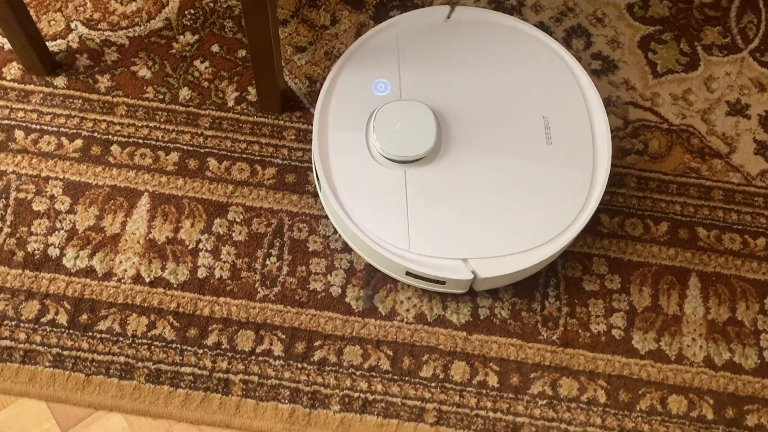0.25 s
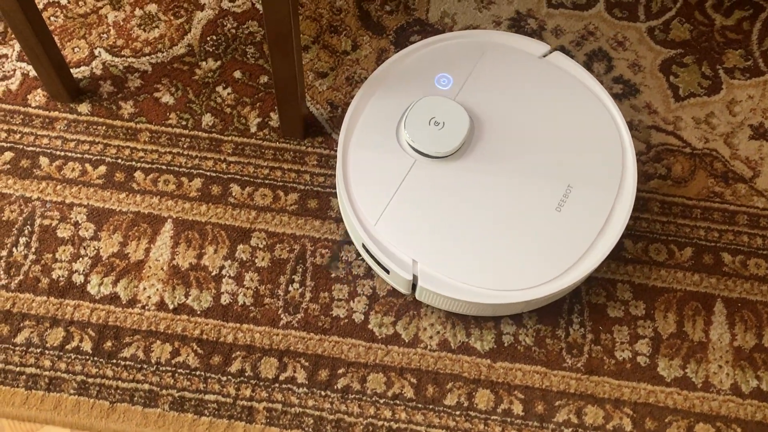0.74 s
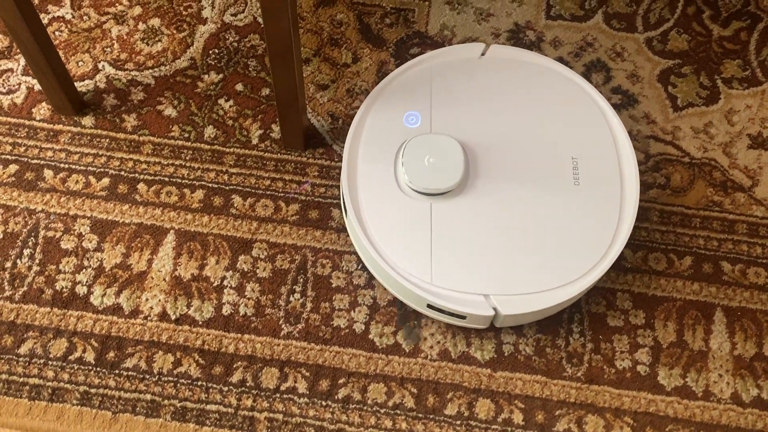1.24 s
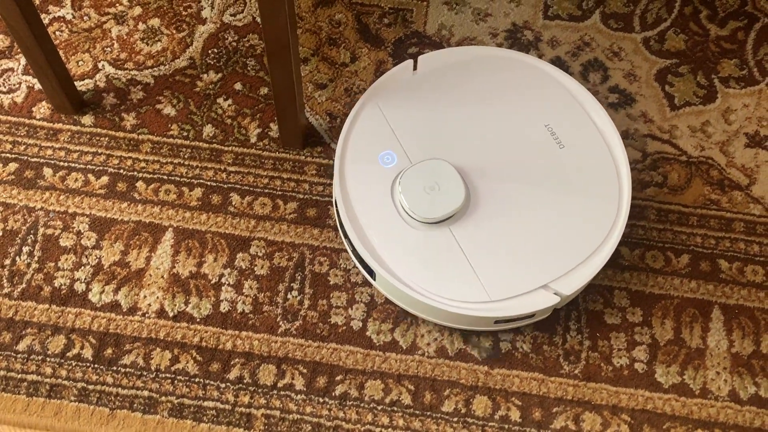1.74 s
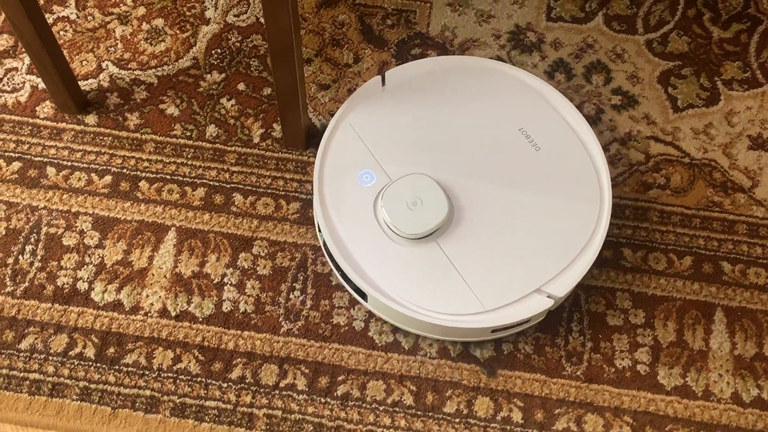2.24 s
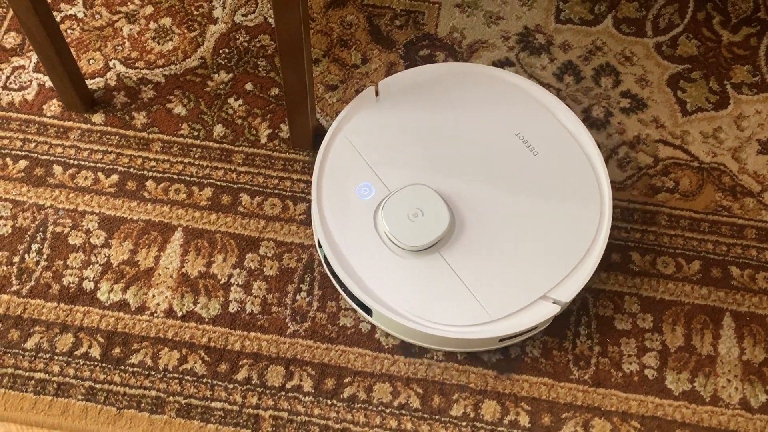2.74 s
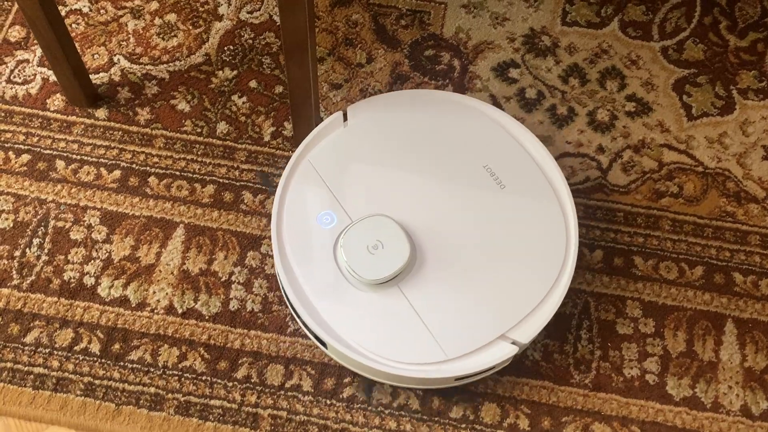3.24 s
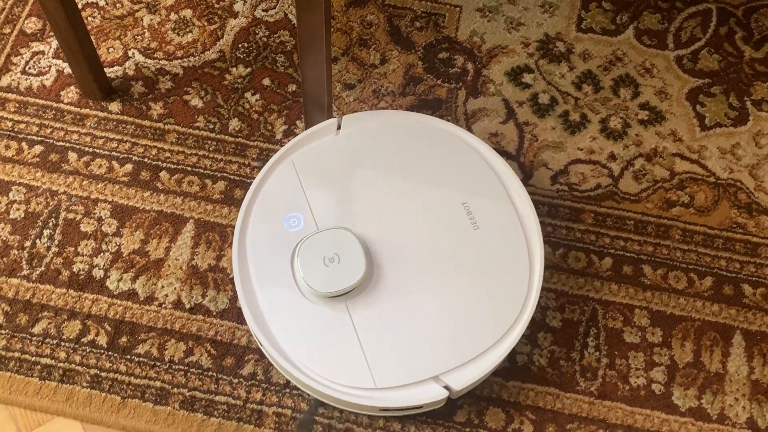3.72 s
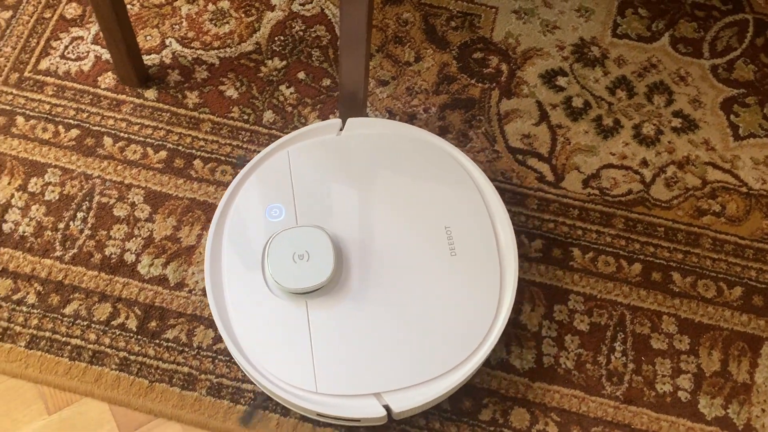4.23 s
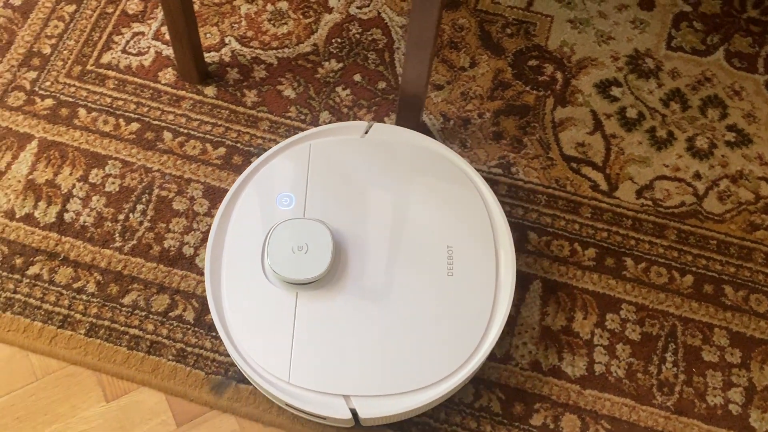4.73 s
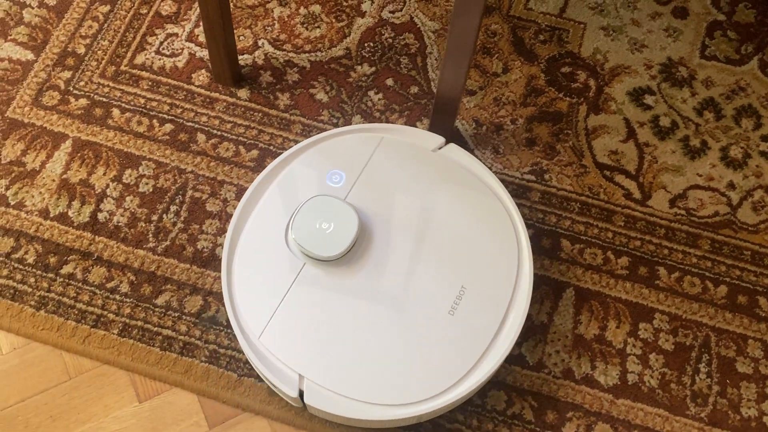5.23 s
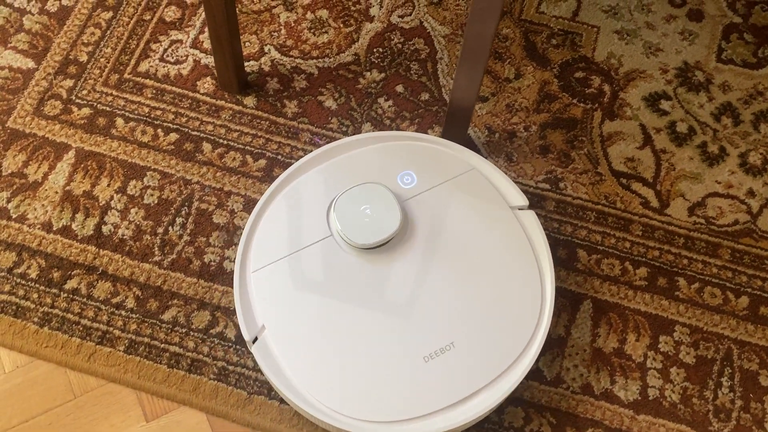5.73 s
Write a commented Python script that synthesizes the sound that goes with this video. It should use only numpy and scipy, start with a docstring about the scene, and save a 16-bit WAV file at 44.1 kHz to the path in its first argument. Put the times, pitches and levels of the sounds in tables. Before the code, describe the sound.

A robot vacuum works on a rug indoors, heard from about a metre above on a hand-held stereo microphone. A steady fan hum, high whine and rush of air run throughout. The brush growls early, briefly again past two seconds, and strains near the end. From about 2.7 to 5 seconds the body rocks in quick soft bass throbs, with faint squeaks and cushioned shell hums.

```python
"""On a rug, a robot vacuum creeps and turns about a metre below a hand-held microphone.
Its suction fan hums at shaft speed, whines as its blades pass the outlet and blows a rush of air.
The geared brush roller starts lightly loaded, then three times digs in, slows down and growls.
The body rocks with soft bass throbs, the shell hums when bumped and a wheel gives short squeaks.
Steady tones are shaken sine waves; rumble and air are shaped noise."""
import sys
import numpy as np
from scipy import signal
from scipy.fft import rfft, irfft, next_fast_len
from scipy.io import wavfile
from scipy.ndimage import uniform_filter1d

SR = 44100
rng = np.random.default_rng(int(sys.argv[2]) if len(sys.argv) > 2 else 0)


def unload_audio(sound):
    """Save the sound as a 16-bit wav file, at the path given as the first command line argument."""
    columns = np.transpose(np.atleast_2d(sound))
    # keep every value between -1 and 1, then stretch to whole-number steps
    steps = np.round(np.clip(columns, -1, 1) * 32767)
    wavfile.write(sys.argv[1], SR, steps.astype(np.int16))


N = 263277
TIME = np.arange(N) / SR  # seconds

# speed of the fan shaft, almost steady: (t/s, speed/turns per s)
FAN_SPEED = [(.35, 271.8), (1.0, 270.5), (1.7, 270.3), (2.3, 269.8), (2.95, 270.1), (3.8, 271.6),
             (4.35, 271.5), (4.57, 270.8), (4.8, 269.0), (5.05, 269.5), (5.45, 270.5), (5.97, 271.1)]
# hum at the shaft speed, swelling as the robot turns: (t/s, level/dB)
HUM_LEVEL = [(0, -50.5), (.8, -48.5), (.98, -42), (2.31, -42), (2.37, -51), (2.6, -43.5), (2.67, -41.5),
             (4.56, -40.5), (4.65, -33.5), (4.95, -35.5), (5.15, -38), (5.6, -42.5), (5.78, -36.5)]
# hum one octave above the shaft: (t/s, level/dB)
OCTAVE_LEVEL = [(0, -44.5), (1.5, -44.5), (2.45, -59.5), (3.3, -41.5), (4.7, -49), (5.97, -47)]
# blade whine, swelling and fading through standing waves in the room, before trim and contrast: (t/s, level/dB)
WHINE_CURVE = [(0.0, -57.5), (.33, -54.5), (.6, -58.5), (1.1, -55.5), (1.38, -54), (1.61, -49.5),
               (2.95, -47), (3.2, -51.5), (3.76, -57), (3.99, -47.5), (4.14, -49), (4.32, -59.5),
               (4.57, -44), (4.65, -54), (4.79, -64), (4.92, -57), (4.99, -48.5), (5.1, -50.5),
               (5.19, -56.5), (5.48, -65.5), (5.7, -58.5), (5.78, -60.5), (5.97, -54)]
# weaker fan tones: (multiple of the shaft speed, level/dB, roughness/0-1, lead of left/rad)
FAN_OVERTONES = [(3, -57, .7, 3.6), (8, -63, .8, 1.5), (10, -63, .8, 1.8), (11, -61, .7, 2.2),
                 (15, -65, .6, 3), (24, -67, .6, 3.1)]

# air stream before the offsets in AIR_FACING: (f/Hz, density/dB per Hz)
AIR_SPECTRUM = [(350, -100), (500, -70), (600, -74.5), (950, -68.5), (1250, -73), (1500, -78.5),
                (1950, -79.5), (2900, -75.5), (3800, -83), (4300, -84), (6300, -78)]
# thin top of the air stream, with the same offsets to come: (f/Hz, density/dB per Hz)
HISS_SPECTRUM = [(7900, -93.5), (10000, -96.5), (12500, -98), (14500, -103), (15700, -110)]
# resonances and dips of the air duct and shell: (f/Hz, width/Hz, lift/dB)
DUCT_RESONANCES = [(648, 30, 6.5), (710, 130, 1.5), (841, 130, 3), (1240, 190, 1.5), (2396, 230, 4),
                   (2330, 63, -6), (3174, 200, 4), (4240, 540, 4), (6180, 280, -4.5)]
# the air rises and falls as the vents turn; only changes about the mean count: (t/s, level/dB)
AIR_SWELL = [(0.0, -55.5), (0.01, -52), (0.65, -49.5), (2.24, -54), (2.31, -57.5), (4.06, -48),
             (5.45, -48.5), (5.94, -50), (5.97, -56)]
# how each part of the air stream follows that swell: (f/Hz, share, offset/dB)
AIR_FACING = [(1170, 0.18, -0.95), (2940, 0.092, 0), (5860, 0.76, -7), (11600, 0.28, -11.5)]
# vent resonances that sweep past as the robot turns: (middle t/s, length/s, f/Hz, width/Hz, lift/dB)
VENT_BEAMS = [(0.495, 0.41, 1220, 302, 3.5), (2.2, 2.2, 6130, 400, 9.5), (2.59, 1.9, 3200, 216, 1.5),
              (2.993, 0.62, 2330, 124, 2.5), (4.095, 0.43, 2830, 198, 4.5), (4.398, 1.5, 4270, 392, 3.5),
              (4.848, .5, 605, 148.4, -9.5), (4.9, 0.65, 2440, 348, -1), (5.703, 1.6, 3260, 600, -4)]

# roller tones before trims, rocking and growl:
# (multiple of roller speed, free level/dB, loaded level/dB, load/0-1 at which it is fully out)
ROLLER_OVERTONES = [(2, -67, -51, .9), (3, -55, -46.5, .4), (4, -49, -48.5, .7), (5, -54, -42.5, .85),
                    (6, -62, -48, .9), (7, -62, -47.5, 1), (8, -54, -41, .7), (9, -53, -47.5, .6),
                    (10, -55, -54, .8), (11, -61, -53, .7), (12, -62, -54, .9), (13, -63, -55, .9),
                    (14, -60, -53, .9), (19, -64, -53, .9)]
# overtones of the brush motor: (multiple of motor speed, free level/dB, loaded level/dB)
MOTOR_OVERTONES = [(2, -56.5, -55.5), (6, -68.5, -57)]
# gears meshing, a whine at three times the motor speed: (t/s, level/dB)
GEAR_MESH_LEVEL = [(0, -49.5), (.4, -46.5), (.8, -53), (1.45, -47), (1.9, -64.5), (2.25, -51), (2.8, -64),
                   (3.9, -50.5), (4.5, -53), (4.8, -47.5), (5.25, -50), (5.5, -57)]
# whine of the roller's gear teeth, clearest while creeping straight on: (t/s, level/dB)
TEETH_LEVEL = [(.2, -56), (.6, -60), (1.7, -58), (2.05, -52), (2.25, -50), (2.5, -51), (2.7, -51),
               (3.1, -49.5), (3.45, -53), (3.9, -63), (5.2, -64), (5.9, -56)]
# the roller drags and digs into the pile; motor level is before the shell colours it:
# (start t/s, time to bite/s, let-go t/s, release/s, load/0-1, motor level/dB, extra growl/dB, growl f/Hz)
ROLLER_DIGS = [(-.4, .8, .5, .1, .38, -57, 1, 225), (.32, .56, 1.07, .13, .93, -41.5, -.5, 225),
               (2.29, .09, 2.53, .13, 1.0, -50, 1, 312), (5.15, .8, 6.2, .1, .86, -37, -.3, 360)]

# bristles scrubbing the rug, before trim, load and shell: (f/Hz, density/dB per Hz)
SCRUB_SPECTRUM = [(20, -107), (35, -99), (60, -83.5), (115, -77.5), (165, -77), (198, -63.5), (222, -70.5),
                  (255, -65.5), (305, -72), (360, -65), (430, -65.5), (500, -65), (580, -66), (750, -100)]
# how much the shell's ring lifts the rumble, most as the robot pivots: (t/s, lift/dB)
SHELL_LIFT = [(0, 0.5), (1.4, -1.5), (3.6, -4), (4.6, 2.5), (4.9, -8), (5.3, 5)]

# rocks of the body on the pile, about ten a second in busy stretches: (middle t/s, strength/dB)
BODY_ROCKS = [(1.68, -10), (1.8, -13), (1.92, -11), (2.02, -10), (2.12, -11.5), (2.23, -11.5),
              (2.752, -1.5), (2.85, -8), (2.937, -3.5), (3.005, 2), (3.106, -3), (3.229, -0.5),
              (3.321, -2.5), (3.442, -7), (3.544, 3), (3.641, -2), (3.747, -5), (3.832, -1.5), (3.916, 1.5),
              (4.0, -2), (4.082, 0), (4.189, -1.5), (4.291, -0.5), (4.366, -4), (4.473, 0.5), (4.558, -2.5),
              (4.666, -4), (4.745, -6), (4.853, -3.5), (4.932, -7), (5.066, -8.5), (5.249, -1)]
# a wheel squeaks on the pile in short slips:
# (start t/s, length/s, first f/Hz, last f/Hz, level at its middle/dB, lead of left/rad)
WHEEL_SLIPS = [(2.8, .05, 820, 850, -42, 2.9), (3.638, .06, 2920, 2880, -49.5, .5),
               (3.662, .048, 2830, 2670, -51.5, .5), (3.718, .038, 2910, 3040, -51, .5),
               (3.755, .058, 2910, 2610, -48.5, .5), (4.055, .045, 950, 1010, -47, 1.5),
               (4.73, .06, 840, 910, -45, 1.5), (4.855, .06, 860, 1010, -41, 2.4),
               (4.93, .045, 830, 860, -44, 2.4)]
# the shell is bumped now and then during the rocking: (middle t/s, f/Hz, level at its middle/dB)
SHELL_BUMPS = [(2.997, 358, -42), (3.747, 380, -50), (3.855, 358, -42), (4.004, 377, -41.5),
               (4.186, 382, -41.5), (4.373, 366, -42), (4.487, 385, -42), (4.555, 389, -43),
               (4.664, 380, -36), (5.093, 383, -46)]

# the two microphone ports: (f/Hz, left over right/dB, coherence/0-1, lead of left/rad)
PORT_TABLE = [(58, -1.5, 0.57, 1.8), (131, 2.5, 0.51, 0.17), (234, 10.5, 1, 1.54), (361, 9, 0.77, 0.76),
              (412, 9.5, 0.31, 2.4), (554, 2.5, 1, 3.39), (888, 1, 0.77, 3.23), (1222, 0.6, 0.69, 4.25),
              (2140, 2.5, 0.063, 3.62), (2290, 1, 0.48, 4.02), (3000, 0.5, 0.85, 3.97),
              (3620, -5, 0.083, 3.24), (5650, 0, 0.26, 3.16), (7350, 0, 1, 1.54)]
# the same table for the treble, where left and right are nearly opposite from 8 to 12 kHz:
# (f/Hz, left over right/dB, coherence/0-1, lead of left/rad)
PORT_TABLE_TOP = [(8300, 0, .997, 3.14), (11500, 0, .997, 3.14), (12500, 0, .8, 3.5), (14500, 0, .47, 4.8)]
# relative depth of the random fine ripple in the air and rumble: (f/Hz, relative depth)
RIPPLE_DEPTH = [(3000, 1), (4500, 1.3), (7000, 1.3), (9000, 1)]

BLADES = 12
WHINE_TRIM_DB, WHINE_CONTRAST = 1.5, 1.13  # overall level, and how strongly the whine follows its curve
# how much turbulence shakes each kind of tone (0-1)
HUM_ROUGH, WHINE_ROUGH, ROLLER_ROUGH, STRAIN_ROUGH = .16, .15, .2, .33

FLUTTER_DB, FLUTTER_HZ = .45, 40  # the whirling bristles chop the air stream: depth and rate

# roller speed running free and its loss under full load (turns a second), and its lag (s)
FREE_SPEED, SAG_SPEED, INERTIA_S = 47.9, 3.5, .04
GEAR_RATIO = 8.68  # motor turns per roller turn
BITE_CURVE = .7  # under 1: the pile takes hold quickly, then tightens slowly
FREE_TRIM_DB, LOADED_TRIM_DB = -1.5, -2.7  # roller tones running free and under load
GROWL_LIFT_DB, GROWL_WIDTH_HZ = 2.5, 40  # each dig rings the shell at its own growl pitch
MOTOR_ONSET, MOTOR_FULL = .28, .44  # loads (0-1) between which the motor starts to sing
MOTOR_BAND_HZ = 70  # the motor sings best while its speed lies in a band this wide
STRAIN_OVERTONE_DB = -10  # octave of the straining motor, relative to its main tone
TEETH_PER_TURN, TEETH_WAVER, TEETH_ROUGH = 51, .004, .8

SHELL_HZ, SHELL_WIDTH_HZ = 395, 50  # the underside of the shell rings here
SCRUB_DB, SCRUB_LOAD_DB = -.8, .7  # rumble trim, and lift at full load

THROB_HZ, THROB_S, THROB_TRIM_DB = 133.5, .064, -47  # pitch, length, and level added to each rock
THROB_EVERY_S = .0965  # span over which the rocking is averaged
ROCK_DB, ROCK_SCRUB_DB = 6, 3.5  # how much rocking swells the roller tones and the rumble
BUMP_S = .051
EDGE_HZ = 15750  # upper limit of the sound


def amp(db):
    """Turns decibels into gain."""
    return 10 ** (np.asarray(db) / 20)


def evened(x):
    """Scales a signal to rms 1."""
    return x / np.sqrt(np.mean(x ** 2) + 1e-20)


def follow(rows, t=TIME, axis=1):
    """Reads one column of a time table, joined by straight lines."""
    table = np.transpose(rows)
    return np.interp(t, table[0], table[axis])


def read(rows, hz, axis=1):
    """Reads one column of a frequency table, joined on a log axis."""
    table = np.transpose(rows)
    return np.interp(np.log(hz + 1), np.log(table[0] + 1), table[axis])


def bell(x, centre, width):
    """Power curve of a resonance: 1 at its centre, half at the edges of its width."""
    return 1 / (1 + (2 * (x - centre) / width) ** 2)


def wander(rate_hz):
    """Slow random drift of rms 1, with little faster than the rate."""
    step = 64  # samples between drawn points
    count = next_fast_len(N // step + 2)
    hz = np.fft.rfftfreq(count, step / SR)
    spectrum = rfft(rng.standard_normal(count)) / (1 + (hz / rate_hz) ** 4)
    slow = evened(irfft(spectrum, count))
    return np.interp(TIME, np.arange(count) * step / SR, slow)


def balance(side_db):
    """Left and right gains whose mean power is 1."""
    pair = np.array([amp(side_db), np.ones_like(side_db)])
    return pair / np.sqrt((pair ** 2).mean(0))


def ports(hz):
    """Balance, coherence and phase between the microphone ports at a frequency."""
    return [read(PORT_TABLE + PORT_TABLE_TOP, hz, axis=k) for k in (1, 2, 3)]


def tone(turns, db, side_db, lead, rough, flutter_hz):
    """A spinning part's tone at both ports; turbulence shakes its height and phase."""
    shake = np.array([wander(flutter_hz) + 1j * wander(flutter_hz) for _ in range(3)]) / np.sqrt(2)
    # one shake is shared, the other two belong to one port each
    carrier = (1 + rough * (shake[0] + .5 * shake[1:])) / np.sqrt(1 + rough ** 2)
    port_phase = np.exp(1j * np.array([[lead], [0]]))
    wave = carrier * np.exp(2j * np.pi * turns) * port_phase
    return np.sqrt(2) * amp(db) * balance(side_db)[:, None] * wave.real


def chirp(start, length, first_hz, last_hz, level_db, side_db, lead):
    """A short tone at both ports that swells, glides a little unsteadily and fades."""
    at = np.flatnonzero((TIME >= start) & (TIME < start + length))
    part = (TIME[at] - start) / length
    glide_hz = first_hz + (last_hz - first_hz) * part
    turns = np.cumsum(glide_hz * (1 + .009 * wander(70)[at])) / SR
    wave = np.sin(np.pi * part) * np.cos(2 * np.pi * turns + np.array([[lead], [0]]))
    out = np.zeros((2, N))
    out[:, at] = np.sqrt(2) * amp(level_db) * balance(side_db)[:, None] * wave
    return out


def turbulence(level_db, ripple_db, flicker_db, size=2048):
    """Noise at both ports with the density level_db(t, hz), plus random fine ripple and flicker."""
    hop = size // 4
    t = np.arange(N // hop + 5)[:, None] * hop / SR
    hz = np.fft.rfftfreq(size, 1 / SR)
    a, b, c, d, ripple, flicker = rng.standard_normal((6, len(t), len(hz)))
    # ripple lasts long but is narrow in pitch; flicker is brief but broad
    ripple = evened(uniform_filter1d(uniform_filter1d(ripple, size=45, axis=0), size=2, axis=1))
    flicker = evened(uniform_filter1d(uniform_filter1d(flicker, size=6, axis=0), size=40, axis=1))
    side_db, same, lead = ports(hz)
    same = np.clip(same, 0, 1)
    right = a + 1j * b
    left = (same * right + np.sqrt(1 - same ** 2) * (c + 1j * d)) * np.exp(1j * lead)
    spectrum = np.array([left, right]) * balance(side_db)[:, None]
    bin_width = 1.5 * SR / size  # Hz
    shaped_db = level_db(t, hz) + ripple_db * read(RIPPLE_DEPTH, hz) * ripple + flicker_db * flicker
    spectrum *= amp(shaped_db) * np.sqrt(bin_width)
    return signal.istft(spectrum.swapaxes(1, 2), nperseg=size, noverlap=size - hop)[1][:, :N]


def grip(start, bite_s, end, release_s, load, t=TIME):
    """The load of one dig, 0-1: the pile takes hold, tightens and lets go."""
    bite = np.clip((t - start) / bite_s, 0, 1) ** BITE_CURVE
    return load * bite * np.clip(1 - (t - end) / release_s, 0, 1)


def drag(t=TIME):
    """The load on the roller, 0-1: the strongest dig at each moment."""
    return np.max([grip(*dig, t) for *dig, _, _, _ in ROLLER_DIGS], axis=0)


def rocking():
    """One soft swell of pressure each time the body rocks."""
    swell = np.zeros(N)
    for middle, level_db in BODY_ROCKS:
        part = swell[round((middle - THROB_S / 2) * SR):][:round(THROB_S * SR)]
        part += amp(level_db) * np.sin(np.linspace(0, np.pi, len(part))) ** 2
    return swell


def pressure(rock):
    """Above zero while the rocking presses the bristles in, below while it lifts them."""
    return rock - uniform_filter1d(rock, size=round(THROB_EVERY_S * SR))


def fan():
    """An uneven fan wheel hums once a turn; its blades passing the outlet whine."""
    turns = np.cumsum(follow(FAN_SPEED) * (1 + .00063 * wander(5.7))) / SR
    out = tone(turns, follow(HUM_LEVEL), side_db=17.0, lead=-1.15, rough=HUM_ROUGH, flutter_hz=14)
    out += tone(2 * turns, follow(OCTAVE_LEVEL), side_db=5.5, lead=3.37, rough=.18, flutter_hz=5.0)
    beam = follow(WHINE_CURVE)
    whine_db = beam.mean() + WHINE_TRIM_DB + WHINE_CONTRAST * (beam - beam.mean())
    out += tone(BLADES * turns, whine_db, side_db=3.5, lead=-1.35, rough=WHINE_ROUGH, flutter_hz=29.4)
    for multiple, level_db, rough, lead in FAN_OVERTONES:
        side_db = ports(round(multiple) * follow(FAN_SPEED).mean())[0]
        out += tone(round(multiple) * turns, level_db, side_db, lead, rough, flutter_hz=2.2)
    return out


def air():
    """Rushing air is noise, coloured by the duct and by the way the vents face."""
    def level_db(t, hz):
        """Density of the air stream in dB per Hz."""
        duct = sum(db * bell(hz, centre, width) for centre, width, db in DUCT_RESONANCES)
        beams = sum(db * bell(t, middle, length) * bell(hz, centre, width)
                    for middle, length, centre, width, db in VENT_BEAMS)
        swell = follow(AIR_SWELL, t) - follow(AIR_SWELL).mean()
        facing = read(AIR_FACING, hz) * swell + read(AIR_FACING, hz, axis=2)
        return read(AIR_SPECTRUM + HISS_SPECTRUM, hz) + duct + beams + facing
    return amp(FLUTTER_DB * wander(FLUTTER_HZ)) * turbulence(level_db, ripple_db=2.6, flicker_db=.7)


def roller(turns, speed, load, rock):
    """Bristle rows slap the rug on every turn, and growl as the pile loads them."""
    # turns by which rocking jostles the bristles
    sway = .012 * uniform_filter1d(rock, size=SR // 4) * wander(12) / rock.mean()
    press_db = ROCK_DB * pressure(rock)
    grips = [(grip(*dig), db, hz) for *dig, _, db, hz in ROLLER_DIGS]
    out = np.zeros((2, N))
    for multiple, free_db, loaded_db, full_load in ROLLER_OVERTONES:
        growl = np.minimum(load / full_load, 1) ** 2
        side_db, _, lead = ports(round(multiple) * speed.mean())
        line_hz = multiple * (FREE_SPEED - SAG_SPEED)
        extra_db = sum(held * (db + GROWL_LIFT_DB * bell(line_hz, hz, GROWL_WIDTH_HZ))
                       for held, db, hz in grips)
        free_part = (1 - growl) * (free_db + FREE_TRIM_DB + press_db)
        loaded_part = growl * (loaded_db + LOADED_TRIM_DB + extra_db)
        out += tone(round(multiple) * (turns + sway), free_part + loaded_part, side_db, lead,
                    ROLLER_ROUGH, flutter_hz=9)
    return out


def motor(turns, speed, load):
    """The geared motor sings when strained, loudest where its speed meets the shell's ring."""
    shaft = GEAR_RATIO * turns
    strain = sum(amp(db) * np.interp(grip(*dig), [MOTOR_ONSET, MOTOR_FULL], [0, 1])
                 for *dig, db, _, _ in ROLLER_DIGS)
    shell_db = 10 * np.log10(bell(GEAR_RATIO * speed, SHELL_HZ, MOTOR_BAND_HZ))
    out = strain * tone(shaft, shell_db, side_db=20.0, lead=.4, rough=STRAIN_ROUGH, flutter_hz=22)
    out += strain * tone(2 * shaft, shell_db + STRAIN_OVERTONE_DB, side_db=5, lead=2.8, rough=.87,
                         flutter_hz=25)
    out += tone(3 * shaft, follow(GEAR_MESH_LEVEL), side_db=2, lead=4.3, rough=.6, flutter_hz=24)
    for multiple, free_db, loaded_db in MOTOR_OVERTONES:
        level_db = free_db + load * (loaded_db - free_db)
        out += tone(round(multiple) * shaft, level_db, side_db=1.5, lead=4.07, rough=.6, flutter_hz=14)
    return out


def gear_teeth(speed):
    """Gear teeth meet many times a turn and whine at that rate."""
    teeth = TEETH_PER_TURN * np.cumsum(speed * (1 + TEETH_WAVER * wander(7))) / SR
    return tone(teeth, follow(TEETH_LEVEL), side_db=.5, lead=4.5, rough=TEETH_ROUGH, flutter_hz=35)


def brush(rock):
    """Load slows the roller with a short lag; roller, motor and teeth all follow its speed."""
    load = drag()
    keep = np.exp(-1 / (INERTIA_S * SR))
    speed = FREE_SPEED - SAG_SPEED * signal.lfilter([1 - keep], [1, -keep], load)
    turns = np.cumsum(speed * (1 + .003 * wander(9))) / SR
    return roller(turns, speed, load, rock) + motor(turns, speed, load) + gear_teeth(speed)


def scrub(rock):
    """Bristles in the pile rumble as low noise, stronger under load and coloured by the shell."""
    def level_db(t, hz):
        """Density of the rumble in dB per Hz."""
        shell = follow(SHELL_LIFT, t) * bell(hz, SHELL_HZ, SHELL_WIDTH_HZ)
        return read(SCRUB_SPECTRUM, hz) + SCRUB_DB + SCRUB_LOAD_DB * drag(t) + shell
    rumble = turbulence(level_db, ripple_db=2.0, flicker_db=1.0, size=4096)
    return amp(ROCK_SCRUB_DB * pressure(rock)) * rumble


def throb(rock):
    """Each rock of the body gives a short, soft swell of bass."""
    turns = np.cumsum(THROB_HZ * (1 + .035 * wander(8))) / SR
    return rock * tone(turns, THROB_TRIM_DB, side_db=6.5, lead=1.0, rough=.31, flutter_hz=29)


def squeak():
    """Rubber slips on the pile: a few short, unsteady glides."""
    return sum(chirp(*slip, side_db=6.0, lead=lead) for *slip, lead in WHEEL_SLIPS)


def bumps():
    """Bumps make the shell hum briefly and softly, cushioned by the rug."""
    return sum(chirp(middle - BUMP_S / 2, BUMP_S, hz, hz, db, side_db=14.0, lead=1.0)
               for middle, hz, db in SHELL_BUMPS)


def scene():
    """Fan, air, brush, rocking body, squeaking wheel and bumped shell together."""
    rock = rocking()
    return fan() + air() + brush(rock) + scrub(rock) + throb(rock) + squeak() + bumps()


def record(dry):
    """A steep low-pass filter removes the very top of the treble."""
    lowpass = signal.firwin(1023, EDGE_HZ, window=("kaiser", 9), fs=SR)
    return signal.oaconvolve(dry, lowpass[None], "same", axes=1)


dry = scene()
out = record(dry)
unload_audio(out)
```